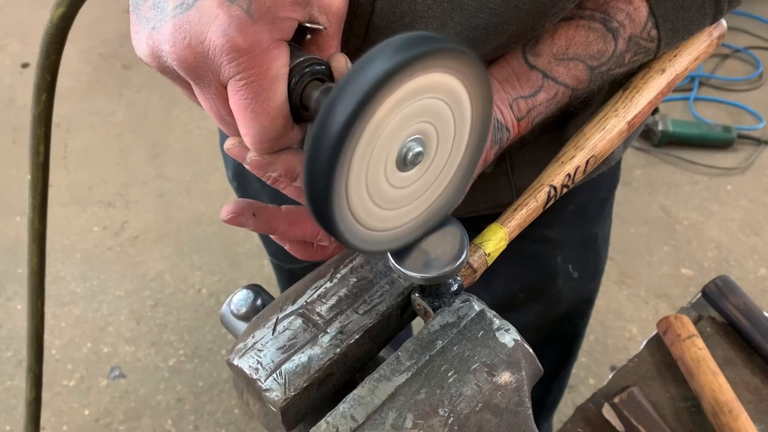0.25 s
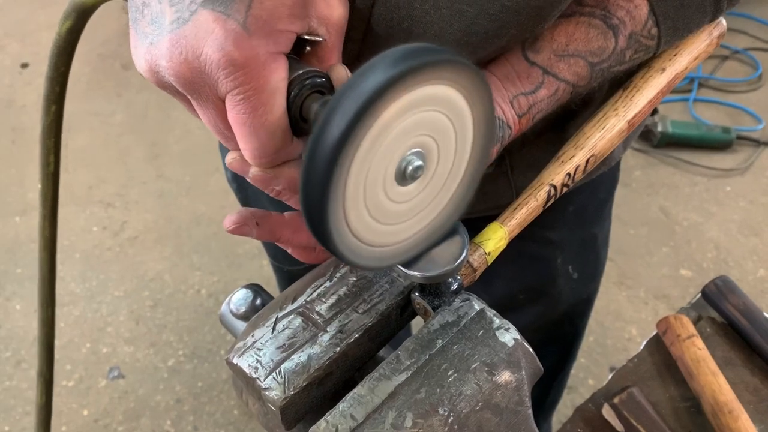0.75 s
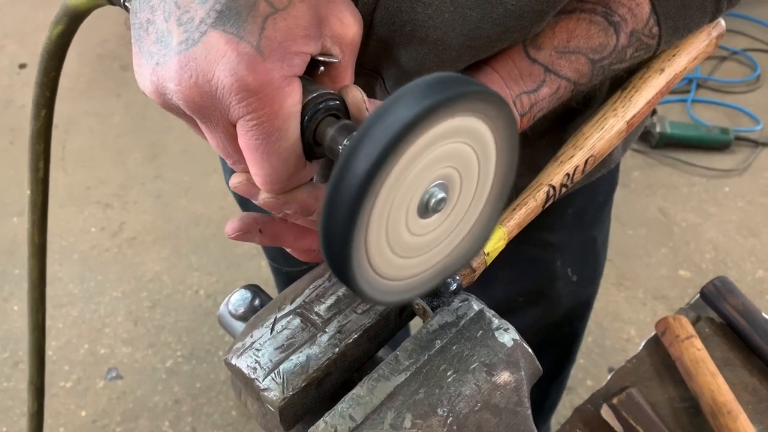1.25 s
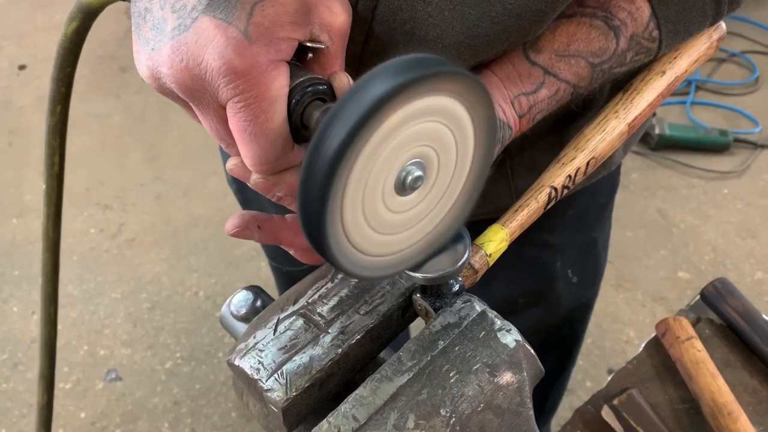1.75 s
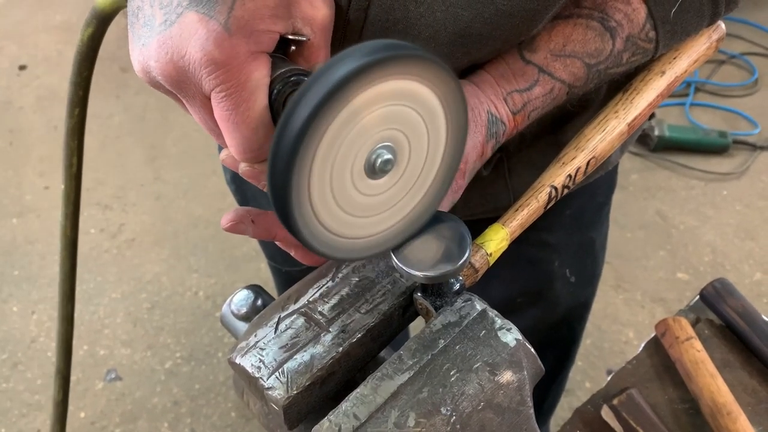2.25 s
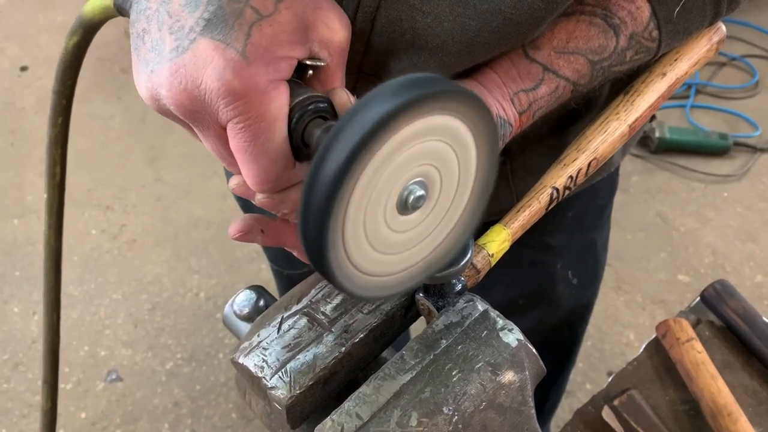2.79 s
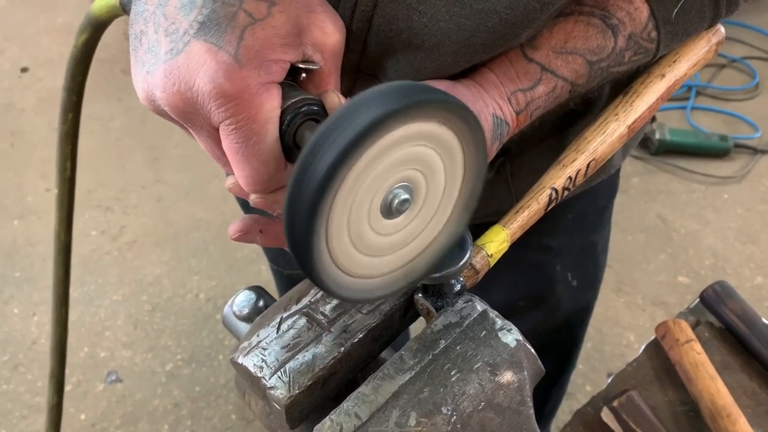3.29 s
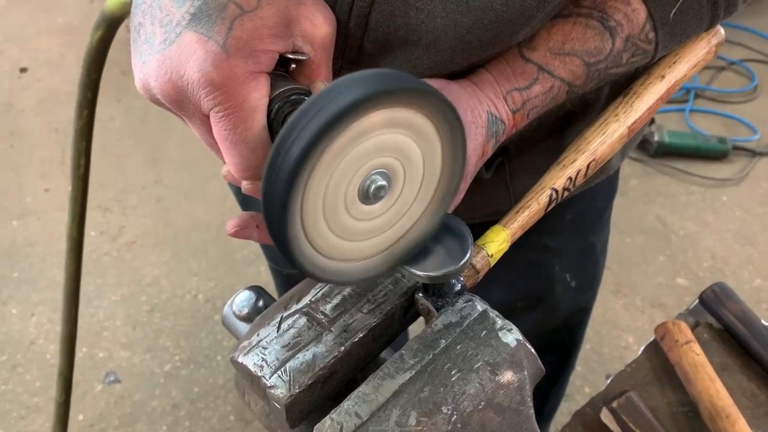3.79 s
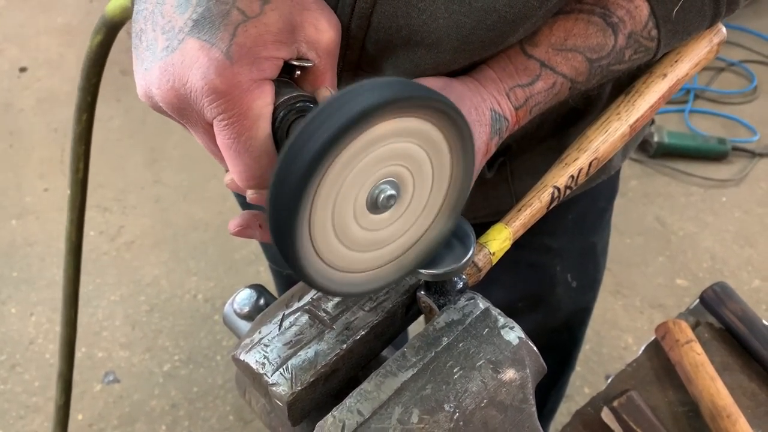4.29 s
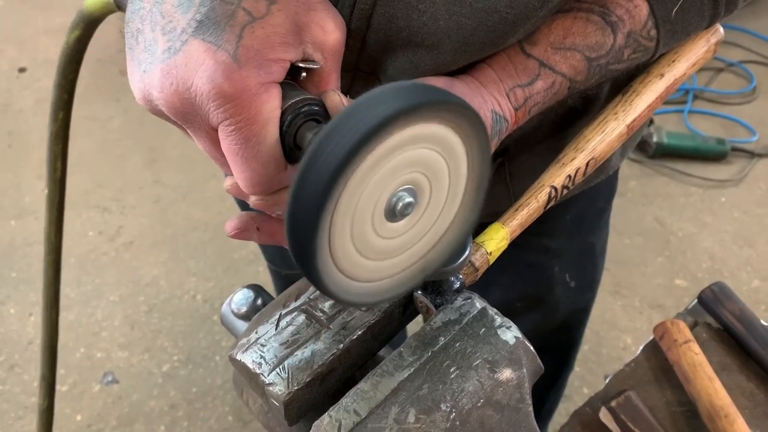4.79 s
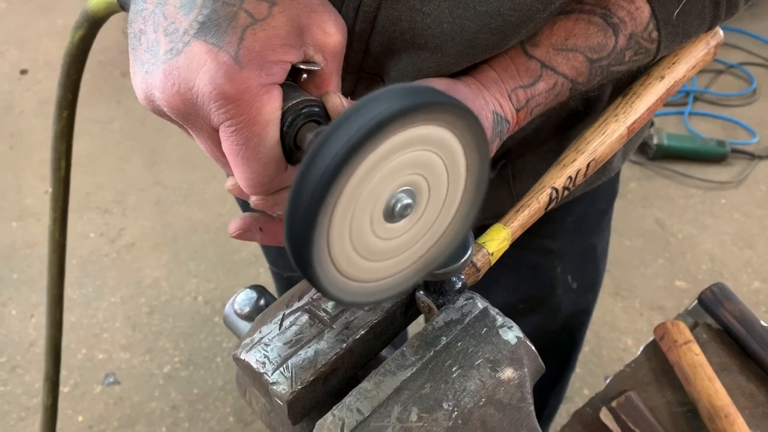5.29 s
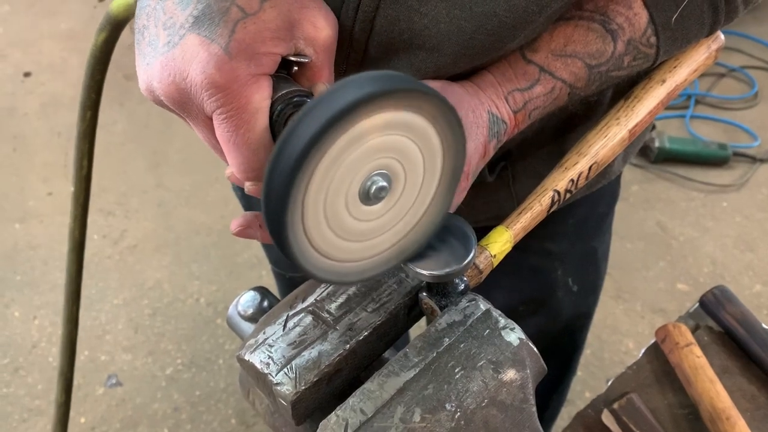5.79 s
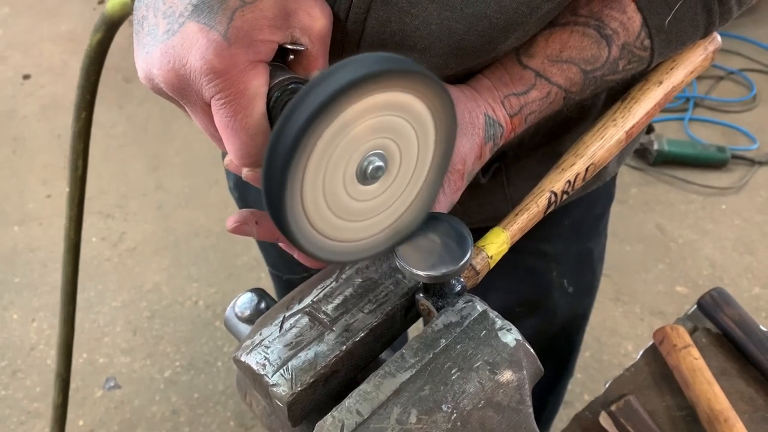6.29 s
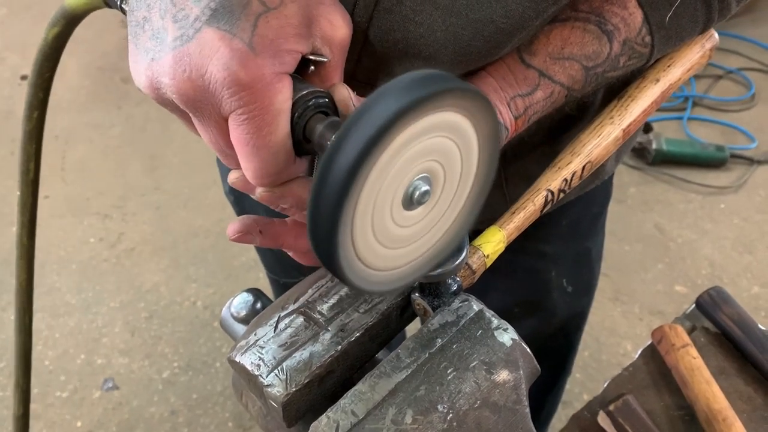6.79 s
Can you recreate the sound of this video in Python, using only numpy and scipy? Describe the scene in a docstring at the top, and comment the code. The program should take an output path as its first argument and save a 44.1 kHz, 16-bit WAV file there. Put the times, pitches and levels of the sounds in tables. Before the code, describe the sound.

A handheld air grinder runs continuously, close to the microphone in a workshop. Bright exhaust hiss stays nearly constant while a buzzy motor hum rises and falls as the buffing wheel is pressed on a steel hammer head and eased off. It dips briefly, races to its highest pitch, then bogs into a deep, rumbling growl midway before recovering in uneven swells. A short, hard room echo surrounds it.

```python
"""In a workshop, an air die grinder spins a buffing wheel against a steel hammer head in a vice, near a phone.
Periodic puffs from the motor's vanes make a harmonic hum that sags as the wheel is pressed on and climbs as
it is eased off. Exhaust hiss is turbulence noise modulated at the vane rate; the dragging wheel adds rumble
and shaft-rate tones, and the spinning wheel swishes. Short scattered tails and reverberation surround it all."""
import sys
import numpy as np
from scipy import signal
from scipy.fft import rfft, irfft
from scipy.io import wavfile
from scipy.ndimage import uniform_filter1d

SR = 44100
rng = np.random.default_rng(int(sys.argv[2]) if len(sys.argv) > 2 else 0)


def output_pcm(signal):
    """Save a mono or channel-first signal as 16-bit PCM at the path in sys.argv[1].

    Samples are clipped to [-1, 1] before scaling.
    """
    pcm = np.clip(np.atleast_2d(signal).T, -1, 1) * 32767
    wavfile.write(sys.argv[1], SR, np.round(pcm).astype(np.int16))


N = 310905
T = np.arange(N) / SR  # time [s]
FREQ = np.fft.rfftfreq(N, 1 / SR)  # frequency [Hz]
BLOCK = 64  # samples for which a tone's gain is held

# Motor speed, sagging whenever the wheel is pressed on: (time [s], vane rate [Hz])
VANE_RATE = [(0.0, 228), (0.095, 233.4), (0.295, 265.4), (0.395, 288), (0.552, 300.2), (0.729, 282.2),
             (0.805, 288.1), (1.048, 294), (1.21, 264.6), (1.39, 158.4), (1.424, 145.6), (1.452, 140.8),
             (1.529, 163.8), (1.705, 237.3), (1.862, 291.1), (2.09, 354.6), (2.295, 383.0), (2.324, 378.7),
             (2.352, 362.9), (2.443, 272.3), (2.481, 244.8), (2.548, 236.2), (2.614, 264.1), (2.638, 266.3),
             (2.786, 224), (2.838, 198.9), (2.924, 121.8), (2.962, 105.1), (2.981, 105.8), (3.033, 114.6),
             (3.114, 106), (3.21, 105.1), (3.543, 69.2), (3.657, 59.5), (3.729, 64.45), (3.838, 80.05),
             (3.943, 106.1), (4.024, 115.6), (4.062, 111.8), (4.148, 83.6), (4.219, 74), (4.267, 77.1),
             (4.362, 93.3), (4.49, 96.8), (4.548, 106.5), (4.643, 129.6), (4.833, 159.6), (4.886, 178.9),
             (5.019, 248.2), (5.057, 258.7), (5.09, 252.7), (5.171, 232.4), (5.305, 215.5), (5.414, 221.3),
             (5.567, 220.7), (5.614, 210.4), (5.69, 184.9), (5.781, 168.6), (5.843, 176.5), (5.943, 222.4),
             (6.005, 239.3), (6.105, 249.2), (6.238, 252.2), (6.314, 264), (6.39, 255.3), (6.452, 226.6),
             (6.548, 190.4), (6.581, 197), (6.681, 245.3), (6.814, 275), (6.929, 263.2), (7.048, 224.6)]
# Vane rates of the labouring, cruising and racing motor: (vane rate [Hz])
PUFF_RATES = [110, 175, 290]
# Spectrum of one vane puff before radiation:
# (multiple of vane rate [1], labouring level [dB], cruising level [dB], racing level [dB])
PUFF_HARMONICS = [(1, 0, 0, 0), (2, -5, -5, -8.5), (3, -11, -10.5, -13), (4, -20, -19, -15),
                  (5, -30, -29, -20), (6, -33, -19, -24), (7, -38, -31, -30), (8, -40, -29, -29),
                  (9, -42, -32, -33), (10, -44, -33, -35)]
# Broad radiation efficiency of the tool's body: (frequency [Hz], gain [dB])
BODY_RADIATION = [(55, -20), (100, -12.5), (160, -2.5), (230, -2.5), (285, 0), (370, -3), (470, -4.5),
                  (540, -9.5), (590, -19.5), (780, -17), (910, -12), (1050, -5), (1200, -2.5), (1500, -1),
                  (1750, -2), (1950, 1), (2300, -4), (3000, -16)]
# Resonances and one notch of housing and exhaust passage: (frequency [Hz], width [Hz], lift [dB])
HOUSING_MODES = [(656, 176, 14), (782, 88, -6.5), (800, 24, 6.5), (1410, 120, 4)]
# Base level of the hum as the tool moves about: (time [s], level [dB])
HUM_LEVELS = [(0.0, -30.5), (0.2, -32.5), (0.5, -30), (0.75, -32), (1.0, -30.5), (1.2, -31.5), (1.5, -32),
              (2.1, -30.5), (2.45, -31), (2.65, -30.5), (3.0, -31.5), (3.65, -33.5), (4.0, -32.5),
              (4.5, -32), (5.05, -31), (5.4, -31), (5.8, -31.5), (6.3, -31), (6.55, -31), (6.85, -30.5),
              (7.05, -30)]
HUM_WAVER_DB = 0.42  # rms
# Once-a-turn vibration of spindle and wheel, relative to the hum: (frequency [Hz], level [dB])
SHAFT_VIBRATION = [(20, -48), (60, -39), (90, -31), (150, -31.5), (190, -31.5), (230, -37), (330, -39),
                   (450, -47), (600, -40), (800, -36), (1050, -32), (1400, -31), (1750, -35), (2200, -36),
                   (3000, -44)]

# Relative hiss spectrum, outlet turned away from the phone: (frequency [Hz], density [dB per Hz])
HISS_AWAY_SPECTRUM = [(30, -49), (500, -20), (1400, -14), (2300, -9.5), (2800, -45), (3300, -7.5),
                      (4000, -5.5), (5300, -10), (6700, -2), (7600, -5.5), (8600, 2), (9500, 3.5),
                      (10900, -5), (12300, .5), (14500, -6), (15600, -3.5)]
# Relative hiss spectrum, outlet turned towards the phone: (frequency [Hz], density [dB per Hz])
HISS_TOWARD_SPECTRUM = [(30, -51), (500, -20), (1400, -20.5), (2300, -11.5), (2800, -16.5), (4000, -7),
                        (6100, -5), (7200, -3), (7900, 0), (8600, -1), (9300, -0.5), (10300, 3.5),
                        (11500, -1), (13000, 1), (15600, -4.5)]
# Base level of the hiss, before the trim in scene(): (time [s], level [dB])
HISS_LEVELS = [(0, -31), (.5, -32), (1.35, -30.5), (1.9, -31.5), (3.6, -32.5), (4.55, -31.5), (5.1, -30.5),
               (5.67, -31.5), (6.55, -31), (6.95, -30)]
# Outlet direction as the tool swings over the steel: (time [s], away 0 to towards the phone 1 [1])
OUTLET_FACING = [(0, 0.98), (.4, 0.32), (1.05, 0.93), (1.5, 1), (2.1, 0), (2.9, 0.79), (3.9, 0.11),
                 (4.5, 0.3), (5.05, 0.77), (5.3, 0.8), (5.85, 0.011), (6.5, 0.11), (6.9, 0.98)]

# Relative spectrum of the dragging wheel's rumble: (frequency [Hz], density [dB per Hz])
RUMBLE_SPECTRUM = [(20, -44), (40, -18), (65, -12), (110, 0.5), (170, 7.5), (300, 1.5), (430, -4),
                   (600, -15.5), (800, -18), (1100, -6), (1450, -6.5), (1900, -37), (4000, -19)]
RUMBLE_DB, PUTTER = -2, .5  # level relative to the drag [dB]; chopping depth by the oval wheel, 0 to 1
# Drumming tones of the slightly oval wheel, relative to the drag: (frequency [Hz], level [dB])
LUMP_DRUMMING = [(20, -42), (35, -28), (50, -15), (110, -14), (160, -10), (260, -16), (400, -22),
                 (600, -36)]
# Relative spectrum of the spinning wheel's swish: (frequency [Hz], density [dB per Hz])
SWISH_SPECTRUM = [(30, -44), (100, -24), (220, -0.5), (480, -2), (780, -12), (1100, -5), (1450, 3.5),
                  (1750, -33), (2400, 12.5), (3900, -14), (12000, -25)]
SWISH_DB = -51  # at a vane rate of 250 Hz
# Drag level when skimming and bogged down [dB], the vane rate between them [Hz], and the steepness
SKIM_DB, BOGGED_DB, BOG_HZ, BOG_STEEPNESS = -67, -46, 167, 11
BRAKING_DB_PER_OCTAVE_S = 2.5  # dB for each octave per second of slowing; fades out when bogged down

# Phase between the two microphone ports: (frequency [Hz], lead of left over right [rad])
PORT_LEAD = [(20, 0), (400, .15), (700, .7), (1200, 1.1), (1450, .85), (1800, 2.1), (2200, 2.4),
             (2650, 3.1), (3250, 3.2), (3600, 5.7), (4200, 6.28), (5300, 6.1), (6100, 6.9), (6900, 6.35),
             (7500, 6), (8000, 3.9), (8700, 3.14), (10200, 0), (11800, -3.14), (15000, -9.42),
             (15800, -10.4)]
# Scattered sound relative to direct sound: (frequency [Hz], level [dB])
SCATTER_LEVEL = [(100, -23), (400, -16), (600, -4), (800, -7), (1300, -15), (2200, -6), (2700, -35),
                 (3100, -30), (3600, 0), (4400, -12), (5600, 0), (6800, -13), (7700, -3), (8700, -17),
                 (15500, -35)]
SCATTER_T60_S = 0.068
# Workshop reverberation relative to direct sound: (frequency [Hz], level [dB])
WALLS_LEVEL = [(60, -19), (250, -18), (480, -13), (630, -4), (800, -8), (1400, -14), (2400, -17),
               (2900, -28), (3400, -14), (4000, -9), (8000, -13), (15000, -13)]
# Decay time [s], build-up time [s], and the frequency where port differences reach full strength [Hz]
WALLS_T60_S, WALLS_BUILD_S, WALLS_APART_HZ = .6, .025, 900
TOP_HZ = 15750  # upper band edge


def undb(db):
    """Logarithmic law: amplitude gain is ten to the power of the level over 20 dB."""
    return 10 ** (np.asarray(db) / 20)


def unit(x):
    """Power normalisation: scale to an rms of 1."""
    return x / np.sqrt(np.mean(x ** 2))


def curve(rows):
    """Softened linear interpolation: a control per column, lines with half a cubic bow, corners partly rounded."""
    times, *columns = np.transpose(rows)
    place = np.interp(T, times, np.arange(len(times)))
    i = np.minimum(place.astype(int), len(times) - 2)
    u = place - i  # fraction of the way to the next point
    span = np.diff(times)[i]
    controls = []
    for column in columns:
        slope = np.gradient(column, times)
        rise = np.diff(column)[i]
        start_bend = slope[i] * span - rise
        end_bend = slope[i + 1] * span - rise
        bow = .5 * u * (1 - u) * ((1 - u) * start_bend - u * end_bend)
        controls.append(column[i] + u * rise + bow)
    return controls


def spectrum_db(points, hz):
    """Logarithmic frequency scale: levels are interpolated linearly along it."""
    f, db = np.transpose(points)
    return np.interp(np.log(hz + 1), np.log(f), db)


def noise(points):
    """Spectral shaping: white noise filtered to the given colour, at rms 1."""
    white = rfft(rng.standard_normal(N))
    return unit(irfft(white * undb(spectrum_db(points, FREQ)), N))


def walk(rate, t=T):
    """Random modulation: lines join `rate` Gaussian points a second, scaled to rms 1."""
    knots = rng.standard_normal(2048)
    return unit(np.interp(t * rate, np.arange(len(knots)), knots))


def hum(vane_hz, angle, waver_db=0.63):
    """Harmonic synthesis of periodic puffs: four vanes puff once a turn each, and speed alters the overtones."""
    hz = vane_hz[::BLOCK]
    tone = 0
    for k, *levels in PUFF_HARMONICS:
        db = np.interp(hz, PUFF_RATES, levels)
        db = db + waver_db * walk(11, T[::BLOCK]) * np.log2(k)  # the fundamental does not waver here
        gain = np.repeat(undb(db) * radiation(k * hz), BLOCK)[:N]
        phase = rng.uniform(0, 2 * np.pi) * (k > 1)
        tone = tone + gain * np.cos(k * angle + phase)
    return tone


def radiation(hz):
    """Radiation and resonance: the body's broad response carries narrow housing modes."""
    lift = sum(db / (1 + (2 * (hz - f) / width) ** 2) for f, width, db in HOUSING_MODES)
    return undb(spectrum_db(BODY_RADIATION, hz) + lift)


def spindle(vane_hz, angle, speed_db=4):
    """Rotating imbalance: unequal vanes and an unbalanced wheel rasp at shaft-rate tones, stronger with speed."""
    octaves = np.log2(vane_hz / 250)
    tones = ladder(SHAFT_VIBRATION, vane_hz, angle, pair_db=1.0, waver_db=1.5)
    return tones * undb(speed_db * octaves)


def ladder(colour, vane_hz, angle, pair_db, waver_db, count=40):
    """Shaft harmonics between those of the vanes: even ones are raised and odd ones lowered by pair_db."""
    shaft = angle / 4
    shaft_hz = vane_hz[::BLOCK] / 4
    tones = 0
    for k in range(1, count):
        if k % 4 == 0:  # a vane harmonic
            continue
        db = spectrum_db(colour, k * shaft_hz) + pair_db * (-1) ** k
        db = db + waver_db * walk(5.2, T[::BLOCK])
        gain = np.repeat(undb(db), BLOCK)[:N]
        tones = tones + gain * np.cos(k * shaft + rng.uniform(0, 2 * np.pi))
    return tones


def exhaust(angle, load, facing, flicker_db=0.37):
    """Modulated turbulence: each vane releases a burst of air, and outlet direction sets the hiss colour."""
    # twice-a-turn and once-a-turn unevenness deepens with load
    lope = (.04 + .06 * load) * np.cos(angle / 2) + (.02 + .04 * load) * np.cos(angle / 4)
    bursts = 1 + .27 * np.cos(angle) + .04 * np.cos(2 * angle) + lope
    away = np.sqrt(1 - facing) * noise(HISS_AWAY_SPECTRUM)
    toward = np.sqrt(facing) * noise(HISS_TOWARD_SPECTRUM)
    return unit((away + toward) * bursts * undb(flicker_db * walk(60)))


def wheel(vane_hz, angle, drag, speed_db=3):
    """Friction at an oval rim: rumble pulses twice a turn and lumps drum; the swish grows with speed."""
    octaves = np.log2(vane_hz / 250)
    contact = unit(1 + PUTTER * np.cos(angle / 2))
    rumble = contact * noise(RUMBLE_SPECTRUM) * undb(RUMBLE_DB)
    lumps = ladder(LUMP_DRUMMING, vane_hz, angle, pair_db=3.5, waver_db=1.0, count=24)
    swish = noise(SWISH_SPECTRUM) * undb(SWISH_DB + speed_db * octaves)
    return (rumble + lumps) * drag + swish


def drag_level(vane_hz):
    """Frictional loading: pressure slows the motor, so low speed and rapid sagging both signify more drag."""
    bogged = 1 / (1 + (vane_hz / BOG_HZ) ** BOG_STEEPNESS)
    slowing = np.maximum(-np.gradient(np.log2(vane_hz), T), 0)  # octaves per second
    sag = uniform_filter1d(slowing, size=4096)
    steady_db = SKIM_DB + (BOGGED_DB - SKIM_DB) * bogged
    return undb(steady_db + BRAKING_DB_PER_OCTAVE_S * sag * (1 - bogged))


def bench(x, count=6, size=8192):
    """Interference and scattering: direct sound meets two ports out of phase, with shifting short tails."""
    hz = np.fft.rfftfreq(size, 1 / SR)
    wet = undb(spectrum_db(SCATTER_LEVEL, hz))
    lead = np.interp(hz, *np.transpose(PORT_LEAD))

    def heard(response):
        """Linear superposition: convolve the sound with one pair of path responses."""
        taps = irfft(response / np.sqrt(1 + wet ** 2))
        taps = np.roll(taps, 256, axis=1)  # room for the leading phase, taken off again below
        return signal.oaconvolve(x[None], taps, axes=1)[:, 256:256 + N]

    out = heard(np.exp(.5j * np.array([lead, -lead])))
    shares = np.array([walk(7) for _ in range(count)])
    shares = shares / np.sqrt(np.sum(shares ** 2, axis=0))  # constant total power
    decay = np.exp(-np.log(1000) * T[:size] / SCATTER_T60_S)
    for share in shares:
        tail = unit(rng.standard_normal((2, size)) * decay)
        out = out + share * heard(wet * rfft(tail) / np.sqrt(size))
    return out


def walls(x, size=32768):
    """Diffuse reverberation: an exponentially decaying tail, alike at both ports only in the bass."""
    hz = np.fft.rfftfreq(size, 1 / SR)
    decay = np.exp(-np.log(1000) * T[:size] / WALLS_T60_S)
    fade = decay * np.minimum(T[:size] / WALLS_BUILD_S, 1)
    mid, side = rfft(unit(rng.standard_normal((2, size)) * fade)) / np.sqrt(size)
    apart = np.minimum(hz / WALLS_APART_HZ, 1)
    pair = (mid + np.array([[1], [-1]]) * apart * side) / np.sqrt(1 + apart ** 2)
    taps = irfft(pair * undb(spectrum_db(WALLS_LEVEL, hz)))
    return signal.oaconvolve(x[None], taps, axes=1)[:, :N]


def scene(air_db=0.38, judder=0.0015, flutter=0.00077):
    """Common rotation: one rotor drives hum, hiss and wheel, and its speed sets hum colour and wheel drag."""
    vane_hz, = curve(VANE_RATE)
    hiss_db, = curve(HISS_LEVELS)
    hum_db, = curve(HUM_LEVELS)
    facing = np.clip(curve(OUTLET_FACING)[0], 0, 1)
    drag = drag_level(vane_hz)
    load = drag / drag.max()
    # the rotor's speed flutters, and the grabbing wheel shakes it more
    vane_hz = vane_hz * (1 + (flutter + judder * load) * walk(60))
    angle = 2 * np.pi * np.cumsum(vane_hz) / SR  # phase of the vane rate: four cycles a turn
    hum_db = hum_db + HUM_WAVER_DB * walk(8.4)
    motor = (hum(vane_hz, angle) + spindle(vane_hz, angle)) * undb(hum_db)
    air = exhaust(angle, load, facing) * undb(hiss_db + air_db)
    tool = motor + air + wheel(vane_hz, angle, drag)
    return bench(tool) + walls(tool)


def record(dry):
    """Band limitation: the phone cuts the top with a steep elliptic low-pass."""
    lowpass = signal.ellip(12, .2, 80, TOP_HZ, fs=SR, output="sos")  # order, ripple [dB], rejection [dB]
    return signal.sosfilt(lowpass, dry)


dry = scene()
out = record(dry)
output_pcm(out)
```